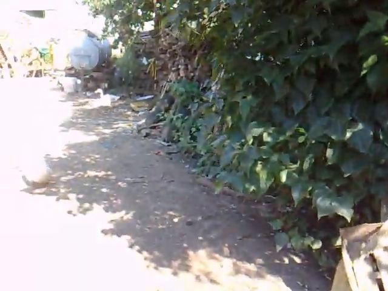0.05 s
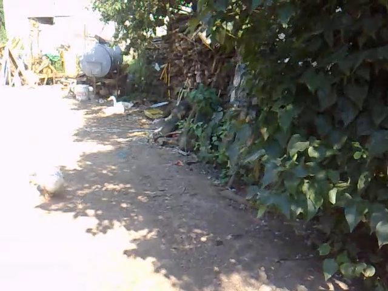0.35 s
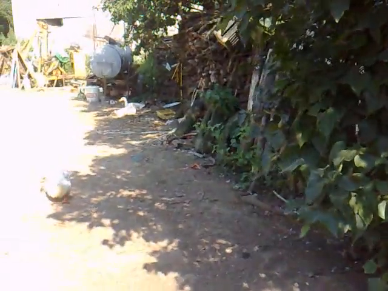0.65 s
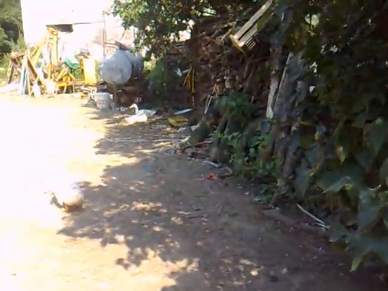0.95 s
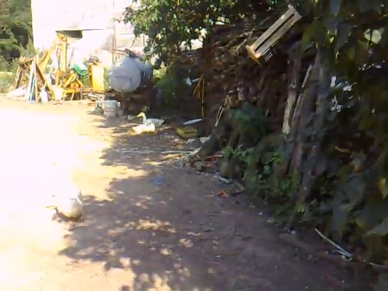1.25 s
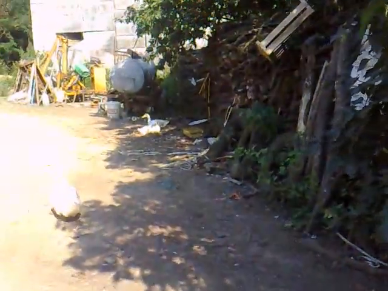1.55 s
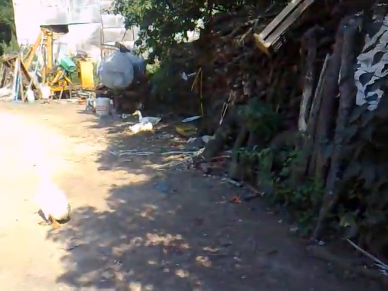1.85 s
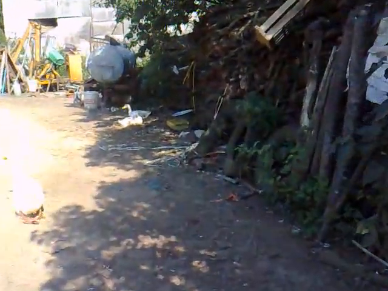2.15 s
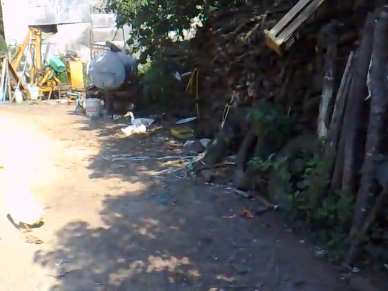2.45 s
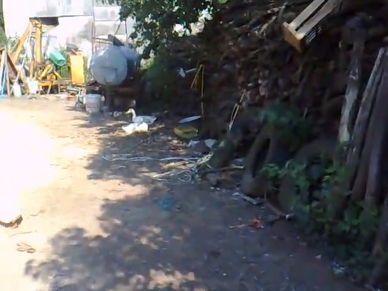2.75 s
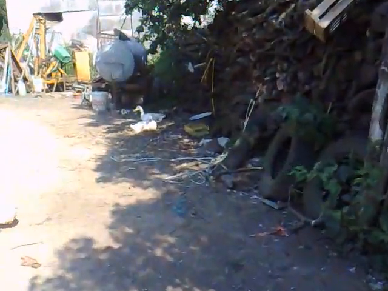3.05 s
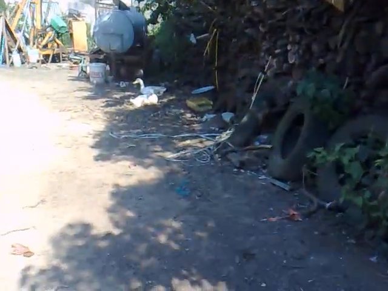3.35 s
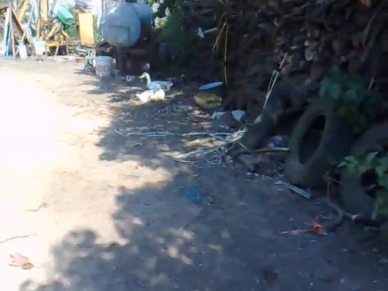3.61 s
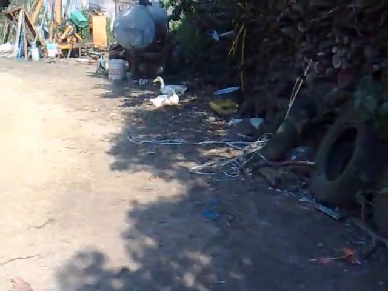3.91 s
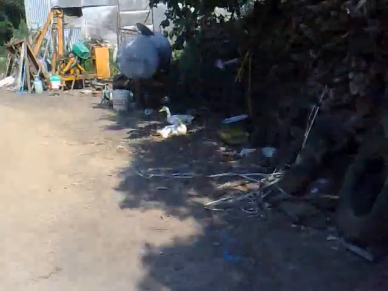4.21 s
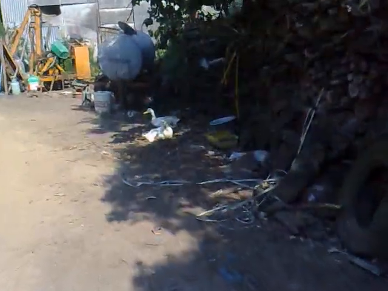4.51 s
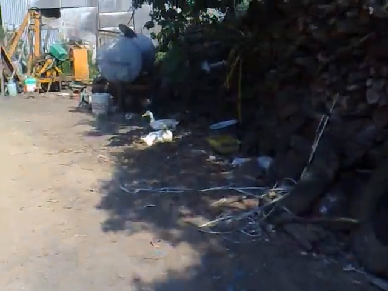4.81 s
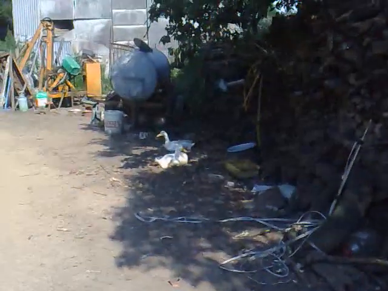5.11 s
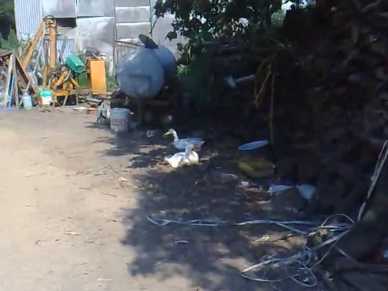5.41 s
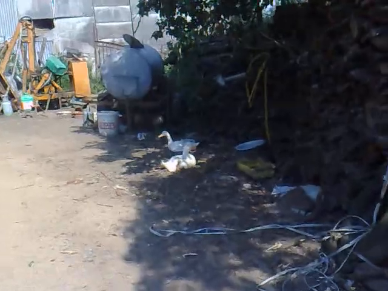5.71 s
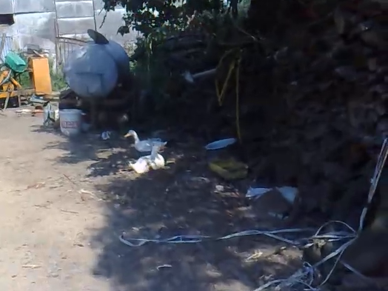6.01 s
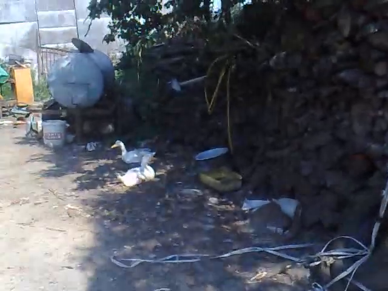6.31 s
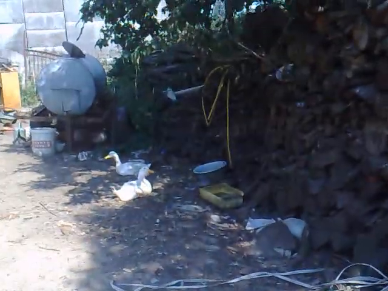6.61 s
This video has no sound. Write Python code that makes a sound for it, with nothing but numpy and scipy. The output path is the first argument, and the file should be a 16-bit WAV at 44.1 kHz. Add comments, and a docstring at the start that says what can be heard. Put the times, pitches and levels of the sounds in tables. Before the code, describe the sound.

One close, hoarse rooster crow trails away, followed by a run of quiet, rattling duck quacks over a low outdoor rumble.

```python
"""Rooster in a farmyard

A rooster crows once, close by: two hoarse short notes, then a long held one that sags, all from a
buzzing membrane shaped by windpipe and beak. Ducks further off answer with short, soft, rattling
quacks. Grit clicks underfoot, small birds whistle far away, and the yard walls give a faint echo
over a low outdoor rumble."""
import sys
import numpy as np
from scipy import signal
from scipy.fft import rfft, irfft, next_fast_len
from scipy.io import wavfile
from scipy.ndimage import uniform_filter1d, minimum_filter1d

SR = 44100
rng = np.random.default_rng(int(sys.argv[2]) if len(sys.argv) > 2 else 0)


def transcribe(signal):
    """Save signal, clipped to [-1, 1], as a 16-bit WAV file at the path in sys.argv[1]."""
    frames = np.atleast_2d(signal).T
    limited = np.clip(frames, -1, 1)
    pcm = np.round(limited * 32767).astype(np.int16)
    wavfile.write(sys.argv[1], SR, pcm)


N = 302526
TIME = np.arange(N) / SR

# tone of still outdoor air: frequency_hz, relative_db
AIR_SPECTRUM = [(12, -31), (20, -14), (54, -1.5), (87, -8), (175, -13), (280, -17), (630, -22.5),
                (1070, -22), (1500, -28), (2030, -24), (2300, -29), (3700, -32), (7500, -37.5),
                (15500, -38.5)]
# fader moves on the bed, which swells and then sinks under the crow: time_s, hiss_db, rumble_db
AIR_FADERS = [(.85, -2, 1.95), (1.3, 5, 0), (2.0, -5.5, -5.5), (3.1, -3.5, -2), (3.6, -2, -2.4),
              (6.86, -1.5, 0.9)]
# reverb time of the yard: frequency_hz, t60_s
YARD_DECAY = [(250, .58), (700, .9), (2000, 0.65), (5000, 0.31), (12000, .22)]
# early reflections off the nearest walls: delay_s, gain
WALL_ECHOES = [(.0071, 0.35), (.019, -0.31), (.034, .3), (.052, 0.27)]
# far birds: start_s, length_s, first_hz, last_hz, level_db
BIRD_WHISTLES = [(.51, 0.061, 5780, 5250, -64.5), (4.331, 0.054, 3310, 3400, -67),
                 (5.096, 0.042, 2150, 2080, -64), (5.279, 0.26, 1867, 1947, -63.5),
                 (5.365, 0.044, 3207, 2900, -66), (5.446, 0.267, 1906, 1945, -60.5),
                 (6.446, 0.239, 4860, 5190, -74.5), (6.637, .08, 5920, 5600, -70)]
# grit and twigs underfoot: start_s, level_db, ring_hz, decay_s, snap_db
GRIT_CLICKS = [(.284, -34, 870, 0.0033, -25.5), (.283, -44, 2640, 0.0049, -28.5),
               (0.382, -35.5, 2370, 0.00089, -2.5), (.444, -32, 2220, 0.0011, -24),
               (2.123, -52.5, 2195, 0.0053, -9), (4.474, -53, 2400, 0.0035, 1.5),
               (4.711, -53.5, 600, 0.0105, -5)]
# the run of quacks: peak_s, swell_s, level_db, throat_hz, upper_resonance_db
DUCK_QUACKS = [(2.104, 0.0232, -48.5, 1367, -3.5), (2.37, 0.036, -46, 1406, -8.5),
               (2.646, 0.02, -48, 1349, -13.5), (3.05, 0.023, -54, 1035, 0), (3.26, 0.031, -42.5, 1330, -3),
               (3.506, 0.012, -37, 1390, -24), (3.79, 0.037, -41, 1458, -16),
               (4.335, 0.023, -48.5, 1420, -12), (4.618, 0.035, -42, 1390, -14),
               (4.864, 0.015, -41.5, 1380, -13), (5.419, 0.03, -51.5, 1400, -10.5),
               (5.519, 0.0114, -51, 1231, 2), (5.691, 0.017, -42, 1380, -10), (5.997, 0.0312, -48, 1383, 3),
               (6.32, 0.00887, -48, 1516, 5.5), (6.417, 0.02, -48, 1154, -8.5),
               (6.568, 0.016, -44.5, 1577, 5), (6.675, 0.016, -43, 1250, -2.5)]
# one duck's voiced honk: time_s, pitch_hz, level_db
HONK_CURVE = [(5.715, 309, -53), (5.736, 336, -49), (5.757, 340.3, -40), (5.775, 342, -43),
              (5.789, 297, -52), (5.806, 295, -57)]
# throat resonances of the honk: centre_hz, width_hz, gain_db
HONK_FORMANTS = [(349, 170, -10), (950, 440, 0.5), (1840, 470, -1.5), (3900, 1000, -21)]

# each crow note starts low and hoarse, scoops upward, then breaks into its held voice:
# start_s, first_hz, break_hz, first_db, break_db, beating (0-1), sizzle_db
CROW_NOTES = [(.876, 549.6, 582.3, -22, -17.5, 0.5, 18.5), (1.205, 577, 665, -22, -7, 0, 0),
              (1.39, 585.6, 668, -23, -6.5, 0, -5.5)]
# held voice, one curve a note from break to release: time_s, pitch_hz, effort_db, roughness (0-1)
CROW_HOLDS = [
    [(.995, 612.7, -13, 0.18), (1.04, 586.5, -13.5, 0.14), (1.064, 606.7, -16.5, 0.46)],
    [(1.256, 768, -11.5, 0.21), (1.305, 764.6, -12, 0.13), (1.338, 761.7, -13.5, 0.15),
     (1.352, 652, -18, 0.94)],
    [(1.428, 761, -12.5, 0.13), (1.49, 762, -12, 0.06), (1.68, 776.6, -15, .05), (1.79, 762.7, -18, 0.02),
     (1.93, 733.2, -19, 0.05), (2.02, 733.7, -22, .015), (2.12, 730.4, -26, 0.02),
     (2.38, 728.7, -25.5, 0.02), (2.68, 720, -31, 0.02), (2.88, 714.5, -27.5, 0.02),
     (3.03, 714.1, -27, 0.04), (3.12, 708, -31, .04), (3.18, 690.2, -29.5, 0.02), (3.26, 648, -27.5, 0.14)],
]
# tone of windpipe and beak: frequency_hz, relaxed_db, strained_db
CROW_THROAT = [(484, -20, -18), (578.5, 3, -7), (788.4, -3.5, 1.5), (1160, -10.5, -13), (1477, 12.5, -6.5),
               (1670, -10.5, -4), (2220, -16, -13.5), (2800, -17.5, -21.5), (3505, -36.5, -33),
               (3720, -20.5, -37.5), (4360, -58.5, -40.5), (4710, -39, -25.5), (5050, -42, -37.5),
               (6200, -33.5, -55.5), (6700, -34.5, -44), (7400, -46, -56.5), (9700, -50, -42.5),
               (12830, -52, -48.5), (14000, -57, -56.5), (15500, -62.5, -58.5)]
# how hard the neck is stretched: time_s, strain (0-1)
NECK_STRAIN = [(1.12, 0.34), (1.2, 0.9), (1.82, 1), (1.97, 0.54)]
# how tightly the throat closes as the air runs out: time_s, pinch (0-1)
THROAT_PINCH = [(2.6, 0.33), (2.85, 0.64), (2.96, 0.37), (3.12, 1), (3.22, 0.71), (3.3, 0.1)]
# the second harmonic rings out and wavers in the long note: time_s, lift_db
SECOND_HARMONIC_LIFT = [(1.68, 0), (1.75, 4), (2.13, 10), (2.21, 18), (2.36, 7.5), (2.5, 15), (2.63, 8.5),
                        (2.72, 12.5), (2.93, 7.5), (3.04, -9.5), (3.11, 5.5), (3.26, -14)]
# crossovers around the fundamental and the five overtone registers: edge_hz
BAND_EDGES = [450, 1000, 1900, 2550, 4200, 5700, 16000]
# one row each for second harmonic, third harmonic, beak range, rasp and sizzle:
# full_effort_db, db_per_effort_db, strain_db, pinch_db, sizzle_share
OVERTONE_REGISTERS = [(-22, 0.59, 0.5, -1, 0.055), (-41, 1.06, 13.5, 13.5, 0.25),
                      (-41, 0.68, 4.05, 17, 0.34), (-60, 1.2, 25.2, 11, .35), (-51, 1.2, 7.5, 16, 1)]
# the beak points away, so much of the treble arrives by way of the walls: frequency_hz, send_db
CROW_SEND = [(600, -25.5), (1500, -16.5), (2500, -10.5), (5000, -1.5), (12000, -10.5)]

ATTACK_S, BREAK_S, RELEASE_S, RELEASE_DB_PER_S = 0.0098, 0.012, 0.066, 394.5
SCOOP_ROUGH, ONSET_ROUGH, ONSET_S, BREAK_ROUGH = 0.18, 0.65, 0.015, 0.16
THROB_DB, THROB_HZ, THROB_S = 4, 14, 0.17  # the level throbs as the long note gives out
DRIFT_DB, DRIFT_HZ, TREMBLE_DB, TREMBLE_HZ = 2, 8.9, 2.5, 23.8  # overtones drift; strain shakes them


def gain_of(db):
    """Decibels to amplitude."""
    return 10 ** (np.asarray(db) / 20)


def unit_rms(x):
    """Scales to an rms of one."""
    return x / np.sqrt(np.mean(x ** 2) + 1e-20)


def at_hz(points, hz):
    """Looks up a spectrum table on a log-frequency axis."""
    f, value = np.transpose(points)
    return np.interp(np.log(hz + 1), np.log(f + 1), value)


def follow(rows, t):
    """Every column of a curve table at the times t."""
    times, *columns = np.transpose(rows)
    return [np.interp(t, times, column) for column in columns]


def add(mix, start_s, sound):
    """Drops a sound into the mix."""
    part = mix[max(round(start_s * SR), 0):][:len(sound)]
    part += sound[:len(part)]


def eq(x, gain):
    """Filters by a gain that is a function of frequency."""
    size = next_fast_len(len(x) + 2048)
    hz = np.fft.rfftfreq(size, 1 / SR) + 1e-3
    return irfft(rfft(x, size) * gain(hz), size)[:len(x)]


def wander(size, hz, step=16):
    """Random motion up to a given rate, rms one."""
    coarse = eq(rng.standard_normal(size // step + 2), lambda f: 1 / (1 + (f / step / hz) ** 4))
    return unit_rms(np.interp(np.arange(size) / step, np.arange(len(coarse)), coarse))


def resonate(x, hz, width_hz):
    """Two like resonators in series, with gain one at a centre that may move."""
    turn = np.exp(2j * np.pi * np.cumsum(hz * np.ones(len(x))) / SR)
    pole = np.exp(-np.pi * width_hz / SR)
    for _ in range(2):
        x = 2 * (turn * signal.lfilter([1 - pole], [1, -pole], x / turn)).real
    return x


def outdoor_air(level_db=-54, patchy_db=2.5, smooth_hz=2500, rumble_hz=220, swing_db=0.9, swing_hz=4):
    """The bed: low rumble that swells at random and far hiss, drifting in patches."""
    frames, hz = N // 512 + 5, np.fft.rfftfreq(2048, 1 / SR)
    real, imaginary, patches = rng.standard_normal((3, frames, len(hz)))
    patches = unit_rms(uniform_filter1d(uniform_filter1d(patches, size=8, axis=0), size=16, axis=1))
    t = np.arange(frames)[:, None] * 512 / SR
    hiss_db, rumble_db = follow(AIR_FADERS, t)
    rumble_db += swing_db * np.interp(t, TIME, wander(N, swing_hz))
    low = 1 / (1 + (hz / rumble_hz) ** 4)
    fader_db = low * rumble_db + (1 - low) * hiss_db
    tone_db = at_hz(AIR_SPECTRUM, hz) + patchy_db * patches / (1 + hz / smooth_hz)
    spectra = (real + 1j * imaginary) * gain_of(tone_db + fader_db)
    bed = signal.istft(spectra.T, nperseg=2048, noverlap=1536)[1][:N]
    return gain_of(level_db) * unit_rms(bed)


def yard_reverb(send):
    """Scattered echoes from walls and woodpile; the treble dies first."""
    taps = np.zeros(SR)
    slots = np.arange(500, SR - 20, 20)
    taps[slots + rng.integers(0, 20, len(slots))] = rng.choice([-1., 1.], len(slots))
    hz, t, spectra = signal.stft(taps, SR, nperseg=256)
    decay = gain_of(-60 * t / at_hz(YARD_DECAY, hz)[:, None])
    tail = signal.istft(spectra * decay, SR, nperseg=256)[1]
    tail /= np.sqrt(np.mean(abs(rfft(tail[:SR])[500:3000]) ** 2))  # unity gain in the mids
    for delay_s, gain in WALL_ECHOES:
        add(tail, delay_s, np.array([gain]))
    return signal.fftconvolve(send, tail)[:N]


def birds():
    """Thin, gliding whistles; the higher ones waver more."""
    out = np.zeros(N)
    for start_s, length_s, first_hz, last_hz, level_db in BIRD_WHISTLES:
        size = round(length_s * SR)
        waver = 0.0062 * (first_hz / 2020) ** 1.8
        hz = np.linspace(first_hz, last_hz, size) * (1 + waver * wander(size, 200))
        whistle = np.sin(2 * np.pi * np.cumsum(hz) / SR) * signal.windows.tukey(size, 0.5)
        add(out, start_s, gain_of(level_db) * unit_rms(whistle))
    return out


def grit():
    """Tiny crunches: a burst that dies in milliseconds, with a dull ring and a bright snap."""
    out, t = np.zeros(N), TIME[:2048]
    for start_s, level_db, ring_hz, decay_s, snap_db in GRIT_CLICKS:
        burst = rng.standard_normal(len(t))
        ring = unit_rms(resonate(burst, ring_hz, width_hz=830))
        click = (ring + gain_of(snap_db) * burst) * np.exp(-t / decay_s)
        add(out, start_s, gain_of(level_db) * click)
    return out


def quack(t, swell_s, throat_hz, upper_db, fade_s=0.037, puff_s=0.01, breath=0.3, rasp_db=-14.5):
    """Slow slaps of the syrinx, each with a puff of air, ring the duck's throat as the bill opens."""
    slap_hz = 54 * (1 + 0.065 * rng.standard_normal())
    cycles = t * slap_hz
    slaps = np.diff(np.floor(cycles), prepend=np.floor(cycles[0]))
    airflow = breath + np.exp(-(cycles % 1) / slap_hz / puff_s)
    puffs = unit_rms(airflow * rng.standard_normal(len(t)))
    envelope = np.exp(-abs(t / np.where(t < 0, swell_s, fade_s)) ** 2.2)
    drive = (0.95 * unit_rms(slaps) + puffs) * envelope
    bill_closed = np.clip(-t / swell_s - 0.5, 0, 1)
    body = resonate(drive, throat_hz * (1 - 0.33 * bill_closed), width_hz=380)
    upper = resonate(drive, hz=1980, width_hz=330)
    rasp = eq(puffs * envelope, lambda f: 1 / (1 + (2500 / f) ** 4) / (1 + (f / 4700) ** 4))
    sound = body + gain_of(upper_db) * upper + gain_of(rasp_db + upper_db / 2) * rasp
    return sound * np.sqrt(np.sum(envelope ** 2) / np.sum(sound ** 2))


def honk(t):
    """A breathy buzz through the duck's nasal formants."""
    hz, level_db = follow(HONK_CURVE, t)
    cycles = np.cumsum(hz * (1 + 0.022 * wander(len(t), 150))) / SR
    buzz = unit_rms(sum(np.cos(2 * np.pi * k * cycles) for k in range(1, 20)))
    drive = buzz + 0.84 * rng.standard_normal(len(t))
    voice = sum(gain_of(db) * resonate(drive, centre, width) for centre, width, db in HONK_FORMANTS)
    return gain_of(level_db) * unit_rms(voice)


def ducks():
    """The run of quacks; one of them opens into a honk."""
    out = np.zeros(N)
    t = np.arange(-round(0.09 * SR), round(0.13 * SR)) / SR  # zero at the peak of a quack
    for peak_s, swell_s, level_db, throat_hz, upper_db in DUCK_QUACKS:
        add(out, peak_s + t[0], gain_of(level_db) * quack(t, swell_s, throat_hz, upper_db))
    honk_t = np.arange(HONK_CURVE[0][0], HONK_CURVE[-1][0], 1 / SR)
    add(out, honk_t[0], honk(honk_t))
    return out


def crow_gesture(note, hold, t):
    """Pitch, effort, roughness and beating of one note: scoop, break, hold, release."""
    start_s, first_hz, break_hz, first_db, break_db, scoop_beating, _ = note
    break_at, release_at = hold[0][0], hold[-1][0]
    scoop = np.clip((t - start_s) / (break_at - start_s), 0, 1) ** 1.4  # gathers speed
    scoop_hz = first_hz + (break_hz - first_hz) * scoop
    scoop_db = first_db + (break_db - first_db) * scoop
    crossfade = np.clip((t - break_at) / BREAK_S + 0.5, 0, 1)
    hz, effort_db, rough = [(1 - crossfade) * low + crossfade * held
                            for low, held in zip([scoop_hz, scoop_db, SCOOP_ROUGH], follow(hold, t))]
    rough += ONSET_ROUGH * np.exp(-((t - start_s) / ONSET_S) ** 2)
    rough += BREAK_ROUGH * np.exp(-((t - break_at) / BREAK_S) ** 2)
    effort_db -= RELEASE_DB_PER_S * np.maximum(t - release_at, 0)
    # the membrane beats when slack (mid-scoop and release) and when rough
    slack = np.sin(np.pi * scoop) + np.clip((t - release_at) / BREAK_S + 1, 0, 1) / 2
    beating = scoop_beating * slack + 0.28 * rough ** 1.6
    return hz, effort_db, rough, beating


def syrinx(hz, rough, beating, jitter=0.053, shimmer=0.43, flutter=2.1, fray=0.24, hiss_db=-5):
    """A buzzing membrane: roughness shakes pitch and strength and lets air through."""
    size = len(hz)
    cycles = np.cumsum(hz * (1 + jitter * rough * wander(size, hz=300))) / SR
    flutter_depth = flutter * np.sqrt(np.clip(rough, 0, 0.2))
    buzz = np.zeros(size)
    for k in range(1, 27):
        # each overtone flutters in level and frays in phase on its own, the high ones most
        swell = np.exp(flutter_depth * (1 - k ** -0.7) * wander(size, hz=35))
        sway_db = 3 * wander(size, hz=9) if k > 4 else 0
        slip = fray * k * np.clip(rough, 0, 1) * wander(size, hz=160)
        buzz += swell * gain_of(sway_db) * np.cos(2 * np.pi * k * cycles + np.pi * k * k / 10 + slip)
    buzz *= 1 + 2 * beating * np.cos(np.pi * cycles)  # every second cycle hits harder
    buzz *= 1 + shimmer * rough * wander(size, hz=300)
    breath = rng.standard_normal(size) * (1 + np.cos(2 * np.pi * cycles) / 2)
    breath = eq(breath, lambda f: np.sqrt(f / 1800 * (1 + (f / 9000) ** 2)))
    return unit_rms(buzz) + gain_of(hiss_db) * rough * breath


def windpipe_and_beak(buzz, strain):
    """Strain morphs the throat from its relaxed tone to its strained one."""
    throat = np.array(CROW_THROAT)
    relaxed = eq(buzz, lambda f: gain_of(at_hz(throat[:, [0, 1]], f)))
    strained = eq(buzz, lambda f: gain_of(at_hz(throat[:, [0, 2]], f)))
    return (1 - strain) * relaxed + strain * strained


def register_levels(t, effort_db, strain, sizzle_db, full_effort_db=-11):
    """Faders in dB for fundamental and overtones: effort lifts them all, strain and pinch brighten."""
    left_s = CROW_HOLDS[-1][-1][0] - t
    throb_db = THROB_DB * np.cos(2 * np.pi * THROB_HZ * left_s) / (1 + (abs(left_s) / THROB_S) ** 8)
    lift_db = uniform_filter1d(follow(SECOND_HARMONIC_LIFT, t)[0], size=2200)
    pinch = follow(THROAT_PINCH, t)[0]
    levels = [effort_db + throb_db]
    for k, (full_db, slope, strain_db, pinch_db, sizzle_share) in enumerate(OVERTONE_REGISTERS):
        slow_db = lift_db if k == 0 else DRIFT_DB * wander(len(t), DRIFT_HZ)
        tremble_db = TREMBLE_DB * strain ** 2 * wander(len(t), TREMBLE_HZ)
        squeeze = pinch ** 3 if k > 2 else pinch  # the top two open only under a tight pinch
        base_db = full_db + slope * (effort_db - full_effort_db)
        bright_db = strain * strain_db + squeeze * pinch_db + sizzle_share * sizzle_db
        levels.append(base_db + bright_db + slow_db + tremble_db)
    return levels


def ride_band(voice, low_hz, high_hz, level_db):
    """Splits off one register, flattens its level and rides it along a fader curve."""
    band = eq(voice, lambda f: 1 / (1 + (low_hz / f) ** 20) / (1 + (f / high_hz) ** 20))
    power = uniform_filter1d(uniform_filter1d(band ** 2, size=1300), size=1300)
    return gain_of(level_db) * band / np.sqrt(abs(power) + 1e-12)


def rooster():
    """The crow: the syrinx buzzes through windpipe and beak, balanced register by register."""
    out = np.zeros(N)
    for note, hold in zip(CROW_NOTES, CROW_HOLDS):
        start_s, release_at = note[0], hold[-1][0]
        t = np.arange(start_s, release_at + RELEASE_S, 1 / SR)
        hz, effort_db, rough, beating = crow_gesture(note, hold, t)
        strain = follow(NECK_STRAIN, t)[0]
        quaver = 0.004 * strain ** 2 * wander(len(t), hz=30)
        voice = windpipe_and_beak(syrinx(hz * (1 + quaver), rough, beating), strain)
        progress = np.minimum((t - start_s) / (release_at - start_s), 1)
        sizzle_db = note[-1] * np.sin(np.pi * progress)  # boost or cut, greatest in mid-note
        levels = register_levels(t, effort_db, strain, sizzle_db)
        sound = sum(ride_band(voice, *band) for band in zip(BAND_EDGES, BAND_EDGES[1:], levels))
        fades = signal.windows.tukey(len(t), min(2 * ATTACK_S * SR / len(t), 1))
        add(out, start_s, sound * fades)
    return out


def scene():
    """Crow, ducks, birds and grit, each direct and again off the yard walls, over the bed of air."""
    crow, flock, whistles, clicks = rooster(), ducks(), birds(), grit()
    crow_send = eq(crow, lambda f: gain_of(at_hz(CROW_SEND, f)))
    crow_direct = eq(crow, lambda f: 1 / np.sqrt(1 + gain_of(at_hz(CROW_SEND, f)) ** 2))
    send = crow_send + gain_of(-18.5) * flock + gain_of(-8.5) * whistles + gain_of(-9.5) * clicks
    return (crow_direct + flock + whistles + clicks + yard_reverb(send) + outdoor_air())[None]


def record(dry, ceiling=0.64, cutoff_hz=15750):
    """A fast limiter holds down the loudest cycles of the crow; a steep low-pass trims the top."""
    safe_gain = np.minimum(ceiling / (abs(dry[0]) + 1e-9), 1)
    limited = dry * uniform_filter1d(minimum_filter1d(safe_gain, size=90), size=90)
    lowpass = signal.firwin(511, cutoff_hz, window=("kaiser", 9), fs=SR)
    return signal.oaconvolve(limited, lowpass[None], "same")


dry = scene()
out = record(dry)
transcribe(out)
```